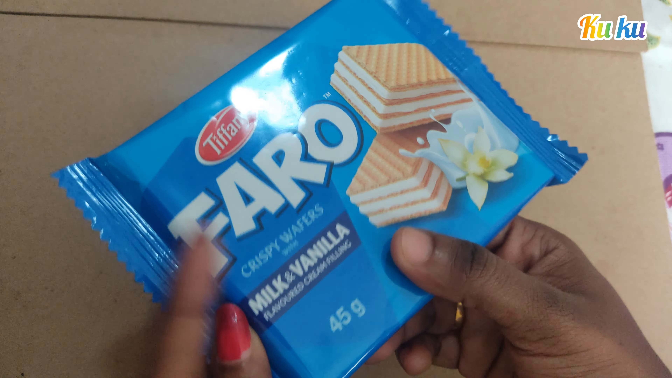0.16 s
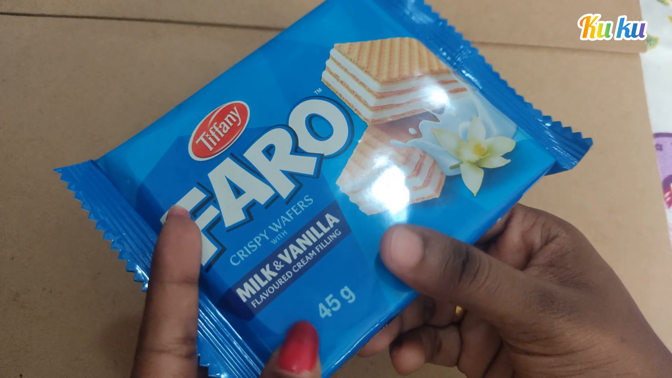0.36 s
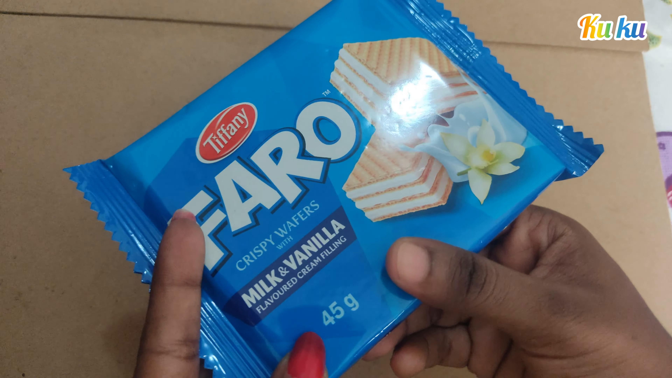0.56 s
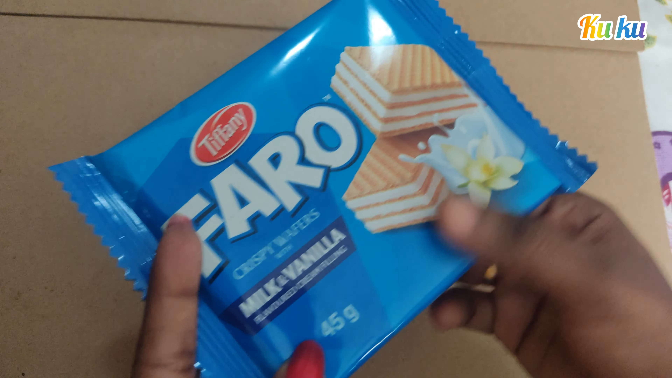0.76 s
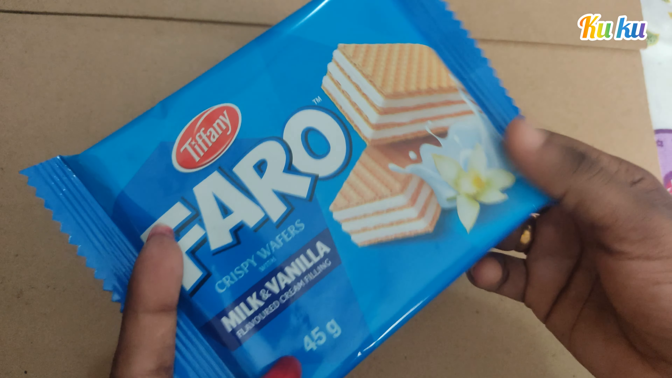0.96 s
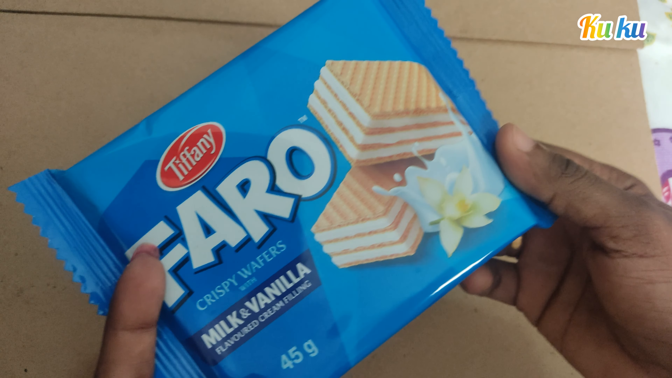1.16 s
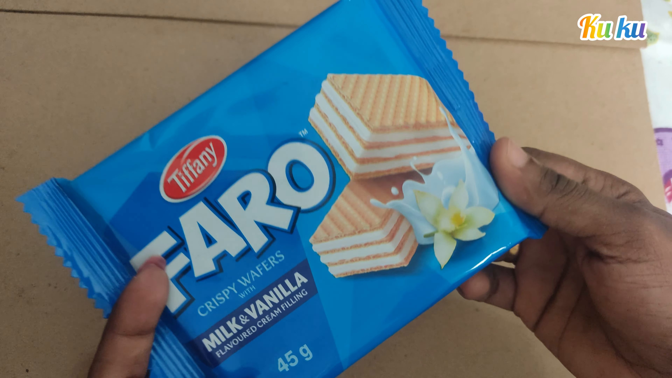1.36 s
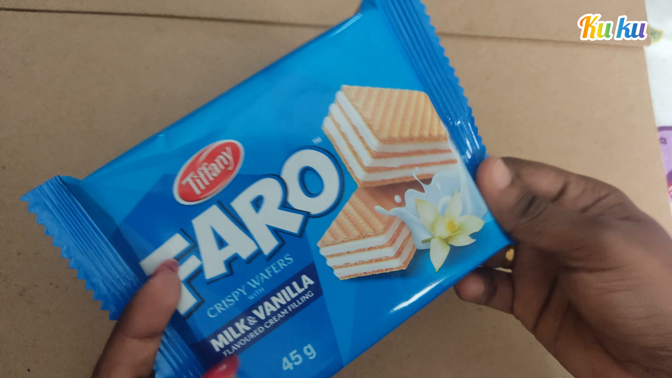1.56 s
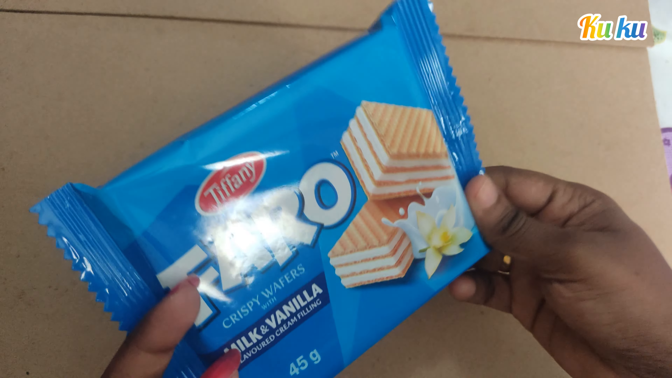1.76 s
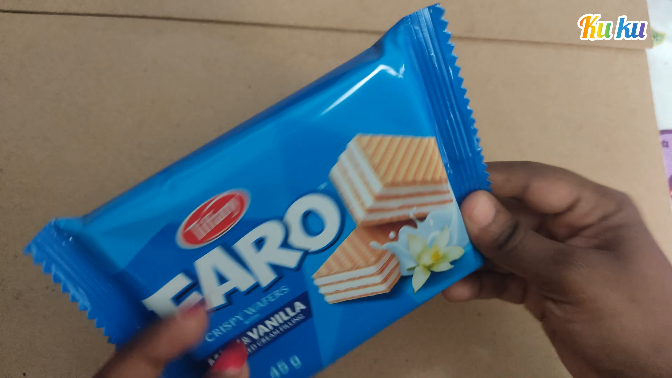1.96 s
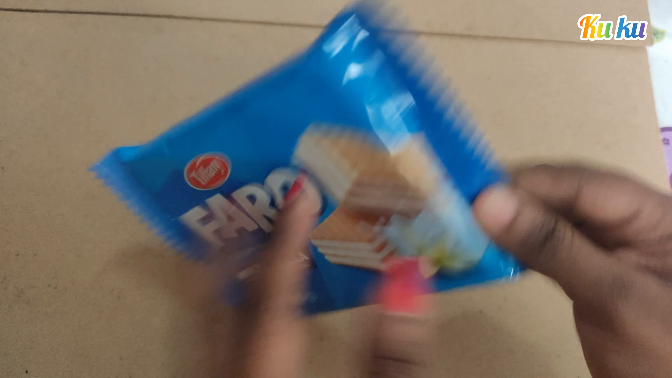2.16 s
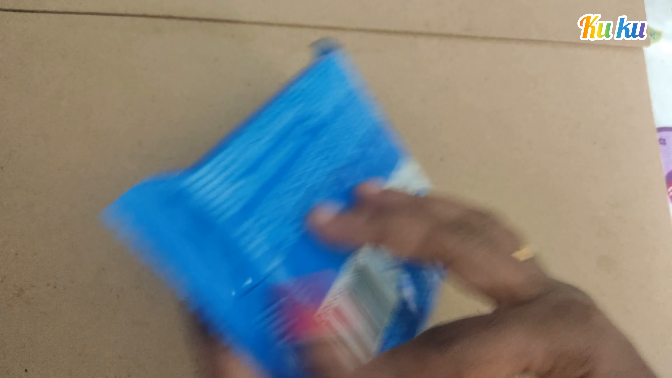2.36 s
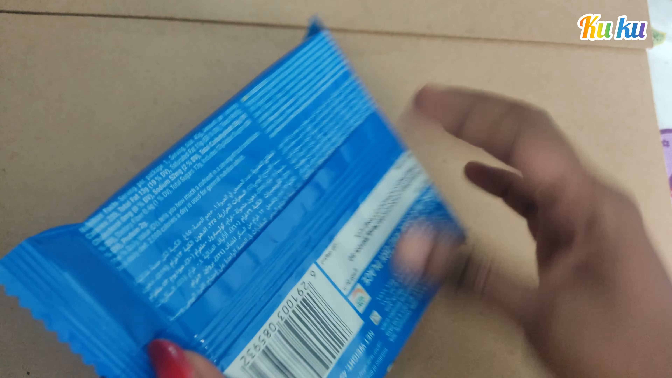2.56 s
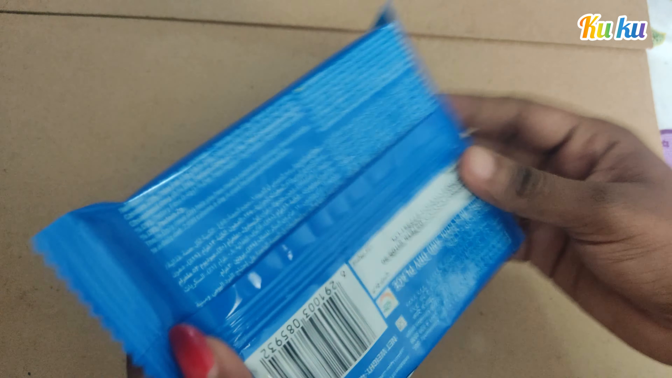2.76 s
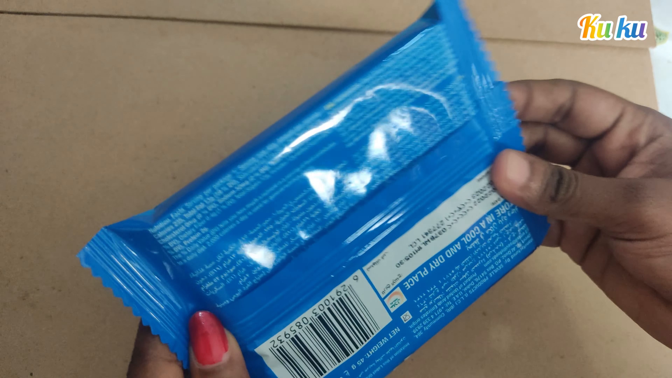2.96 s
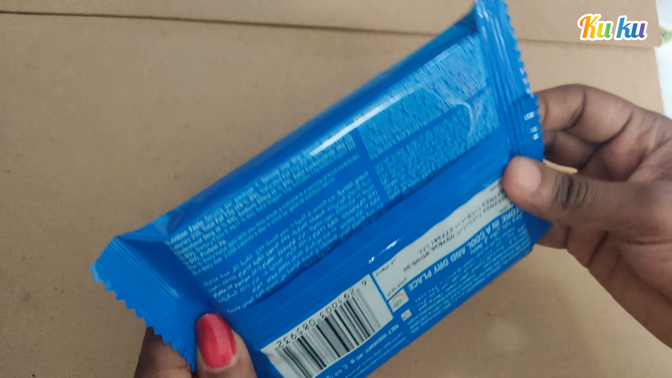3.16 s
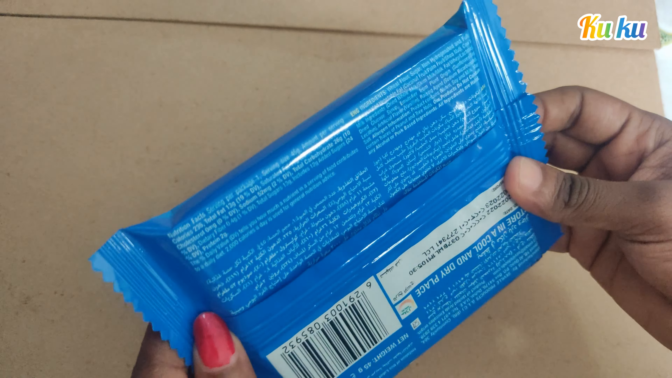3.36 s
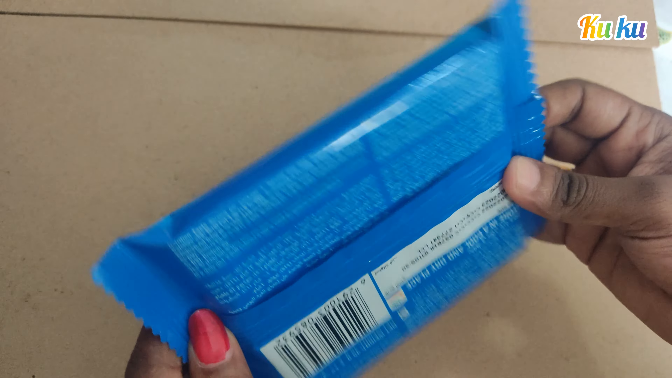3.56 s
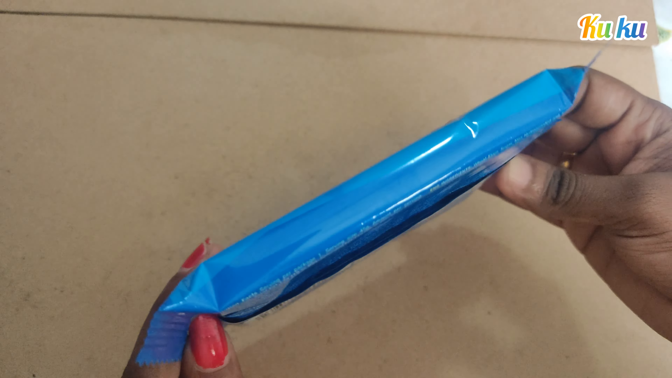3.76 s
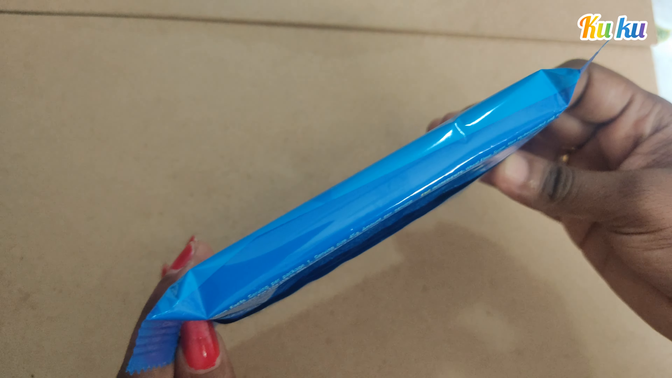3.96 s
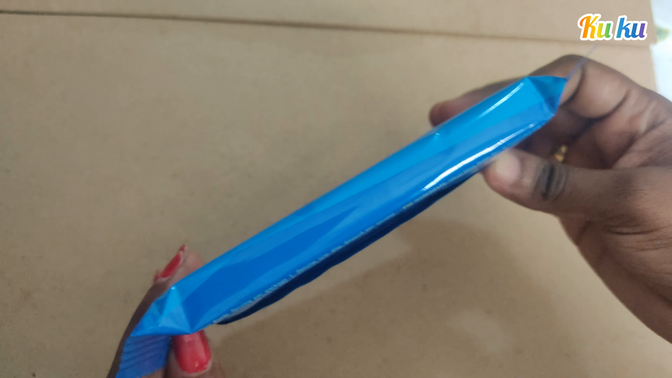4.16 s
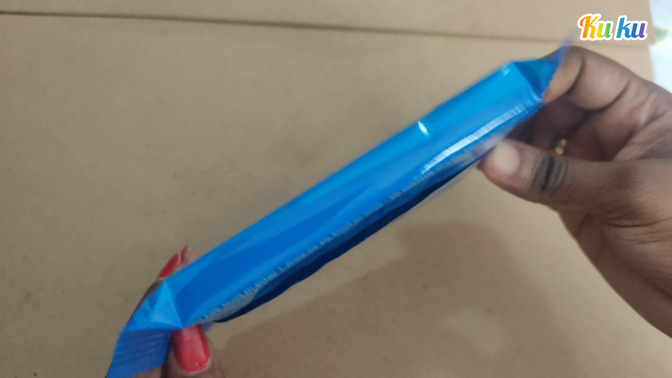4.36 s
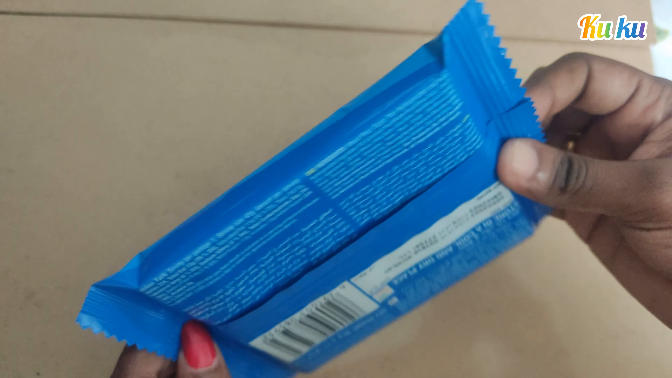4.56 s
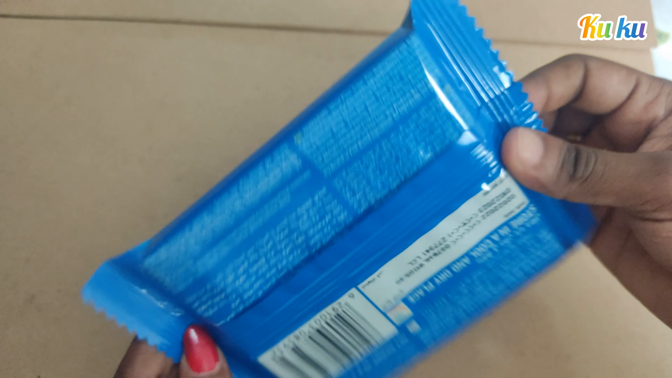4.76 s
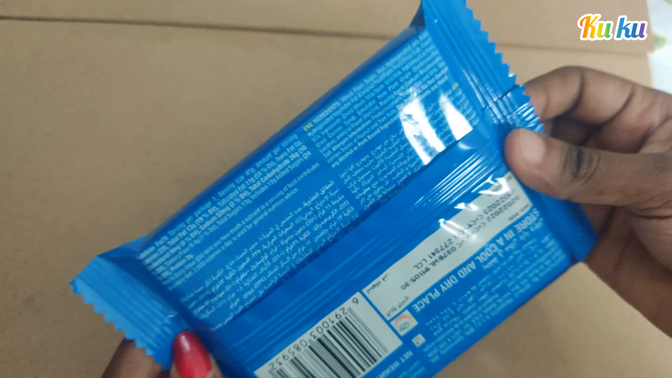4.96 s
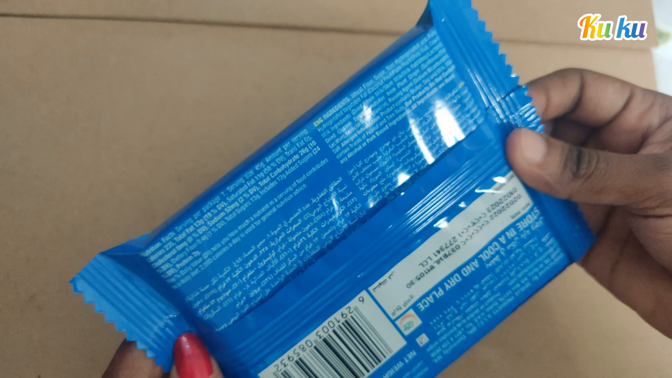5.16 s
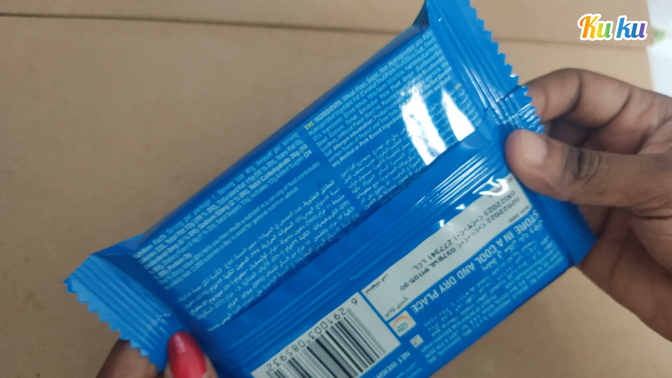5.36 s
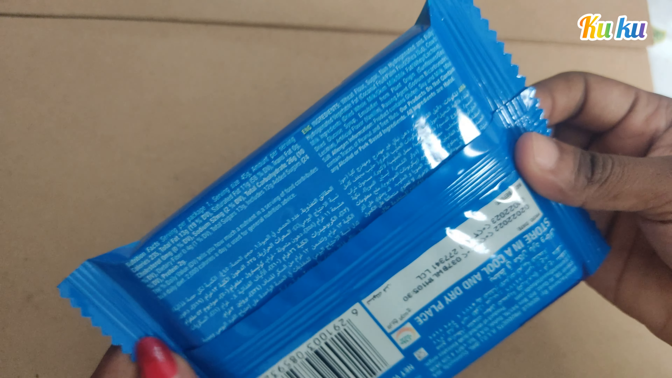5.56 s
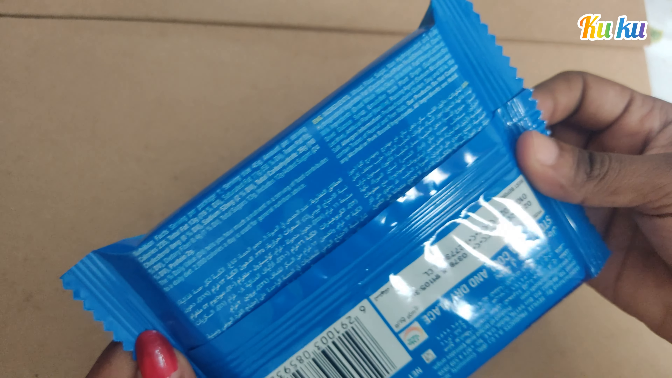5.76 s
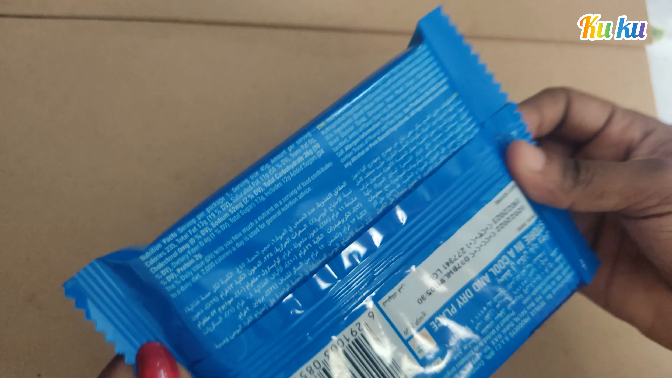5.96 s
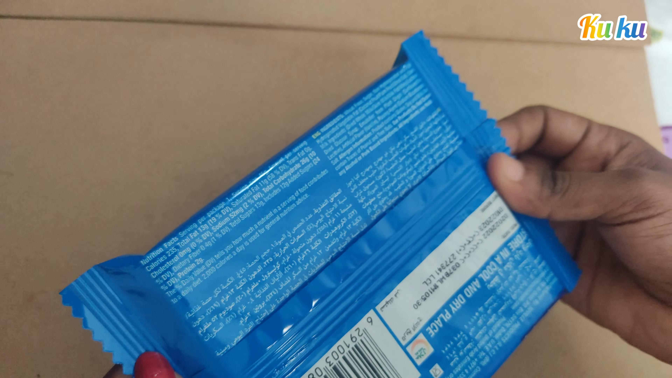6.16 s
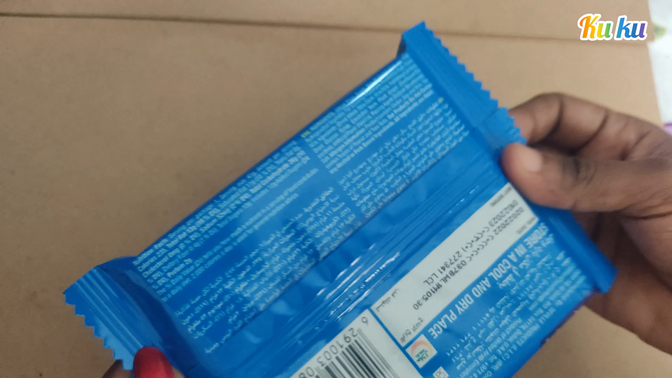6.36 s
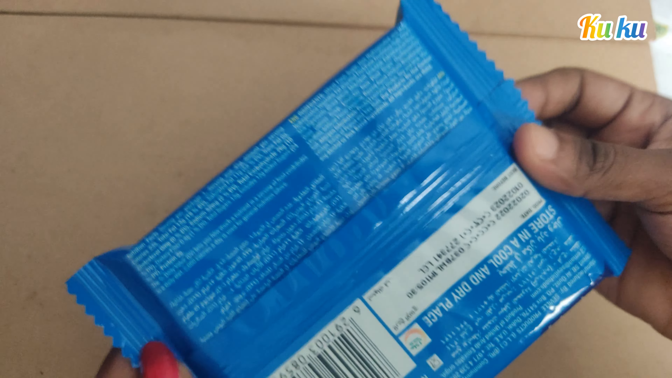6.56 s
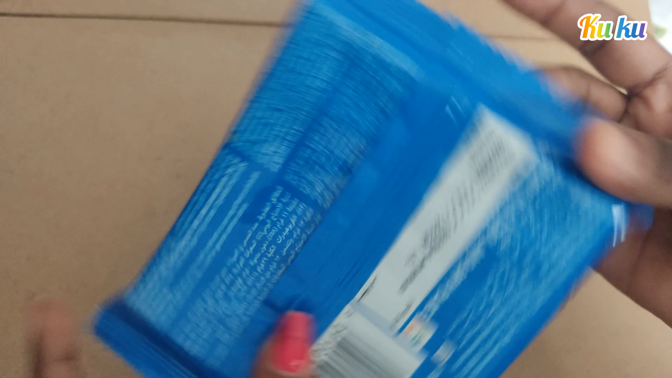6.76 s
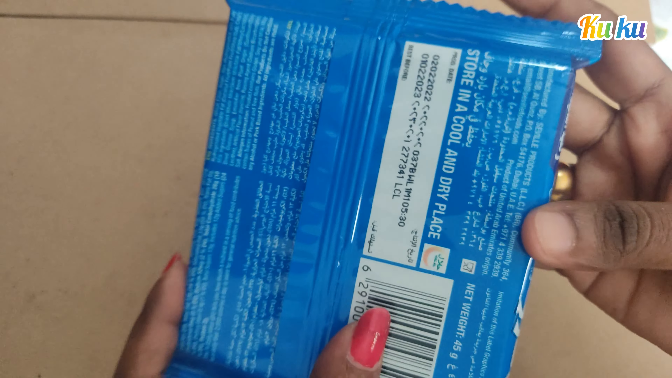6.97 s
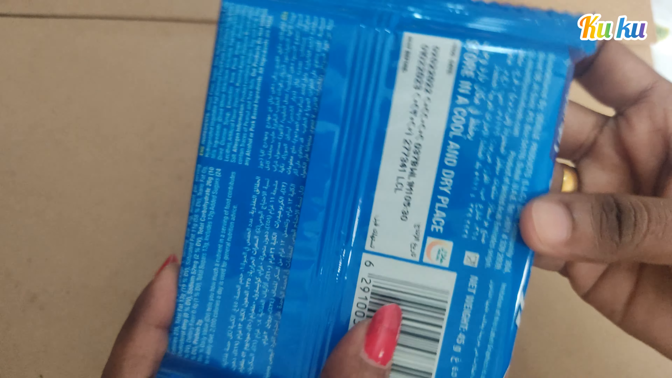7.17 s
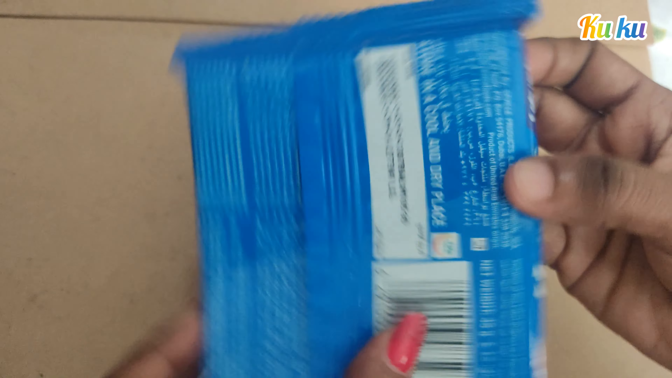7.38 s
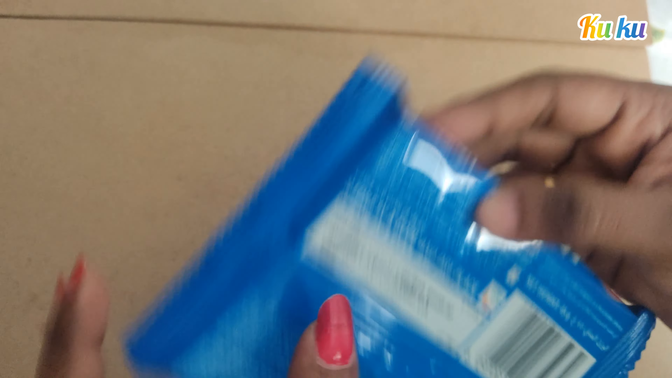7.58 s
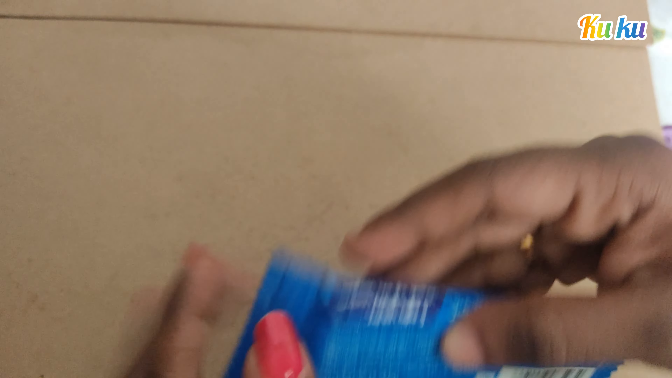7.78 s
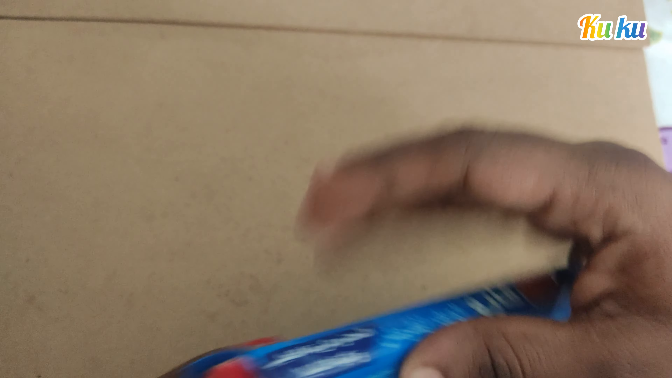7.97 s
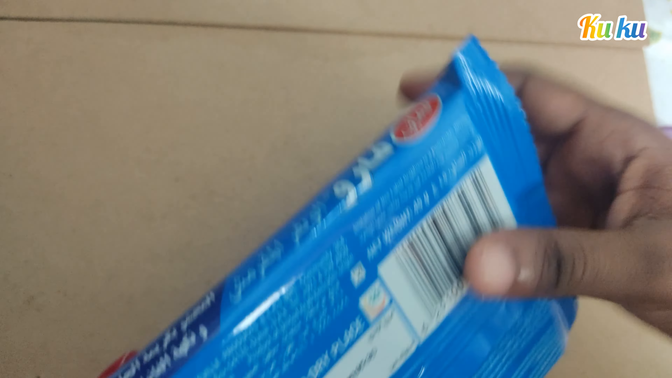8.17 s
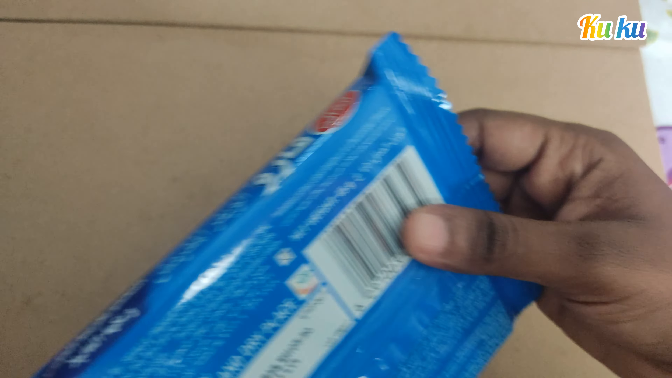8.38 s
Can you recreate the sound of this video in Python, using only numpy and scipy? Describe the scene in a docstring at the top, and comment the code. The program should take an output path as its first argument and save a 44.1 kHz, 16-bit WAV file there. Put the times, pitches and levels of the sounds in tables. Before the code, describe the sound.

Crisp film wrapper crinkles in bursts, busy then sparse, with soft knocks of the wafer inside, over quiet low fan hum and faint hiss.

```python
"""A fan hums under a faint hiss, and then a plastic snack packet turned in two hands snaps, crackles and rubs.
Snaps are short bursts of noise spikes, crackle is grainy noise, and rubbing is grainy noise in ringing folds.
A bare room answers the packet with dying noise; the wafer block inside knocks as damped swings.
Something wooden scrapes nearby: noise through resonances. The fan is noise in narrow low bands.
Both microphone ports ring near 8 kHz; the right one is nearer, so packet sounds reach the left one late."""
import sys
import numpy as np
from scipy import signal
from scipy.fft import rfft, irfft, next_fast_len
from scipy.io import wavfile
from scipy.ndimage import uniform_filter1d, map_coordinates

SR = 44100
rng = np.random.default_rng(int(sys.argv[2]) if len(sys.argv) > 2 else 0)


def materialize(psi):
    """Save the field psi as 16-bit PCM at rate SR to the path in sys.argv[1].

    A 1-D psi becomes a single channel; in a 2-D psi each row is a channel.
    """
    bounded = np.clip(np.atleast_2d(psi).T, -1, 1)
    quanta = np.round(bounded * 32767).astype(np.int16)
    wavfile.write(sys.argv[1], SR, quanta)


N = 371322  # length in samples

# Colour of ticks and crackle, peaking near 8 kHz, with a thin line near 16.5 kHz.
# Each row: frequency in Hz, relative level in dB per Hz.
CRACKLE_COLOUR = [(1760, -58), (3000, -24), (4940, -11), (5780, -5.5), (6720, -2), (7530, 7), (7970, 5),
                  (9000, 2), (9800, -10.5), (10300, -14), (15300, -23.5), (16200, -68), (16500, -41)]


def amp(db):
    """Turn dB into a plain factor."""
    return 10 ** (np.asarray(db) / 20)


def unit(x):
    """Scale a sound to an rms of 1."""
    return x / np.sqrt(np.mean(x ** 2) + 1e-20)


def along(points, hz):
    """Read a curve of (Hz, value) points, joined by straight lines on a log frequency axis."""
    f, v = np.transpose(points)
    return np.interp(np.log(hz + 1), np.log(f + 1), v)


def curves(rows):
    """One value per sample for each column after the time."""
    s, *cols = np.transpose(rows)
    return [np.interp(np.arange(N) / SR, s, c) for c in cols]


def wobble(rate):
    """A smooth random curve with rate knots a second."""
    knots = rng.standard_normal(int(N * rate / SR) + 4)
    return map_coordinates(knots, [np.arange(N) * rate / SR])


def filtered(x, response):
    """Colour x by a complex response of frequency."""
    n = x.shape[-1]
    m = next_fast_len(n + 4096)  # spare room for the ringing
    return irfft(rfft(x, m) * response(np.fft.rfftfreq(m, 1 / SR)), m)[..., :n]


def impulse(spectrum, size=512):
    """A click with the given spectrum that starts at once (minimum phase) and has energy 1."""
    hz = np.fft.rfftfreq(8 * size, 1 / SR)
    level_db = np.maximum(along(spectrum, hz), -70)
    cepstrum = irfft(np.log(amp(level_db)))
    # fold the second half onto the first, so that nothing rings before the click
    cepstrum[1:4 * size] *= 2
    cepstrum[4 * size + 1:] = 0
    h = irfft(np.exp(rfft(cepstrum)))[:size]
    return h / np.linalg.norm(h)


def modes(table):
    """A sum of resonances from rows of (Hz, width in Hz, dB), with alternating signs."""
    def response(f):
        total = 0
        for k, (centre, width, db) in enumerate(table):
            resonance = 1j * f * width / (centre * centre - f * f + 1j * f * width)
            total = total + (-1) ** k * amp(db) * resonance
        return total
    return response


def pair(alike, lag_s=0):
    """Two partly alike noises; the left one lags."""
    a, b = rng.standard_normal((2, N))
    left = np.roll(a, round(lag_s * SR))
    right = alike * a + np.sqrt(1 - alike ** 2) * b
    return np.array([left, right])


def swells(rows, rise_db, fall_db):
    """One gain curve per dB column: every (start, hold, dB..) row rises, holds and falls, in dB a second."""
    s, hold, *cols = np.transpose(rows)[:, :, None]
    t = np.arange(0, N + 64, 64) / SR  # a coarse clock is enough
    shape_db = -rise_db * np.maximum(s - t, 0) - fall_db * np.maximum(t - s - hold, 0)
    gains = []
    for c in cols:
        total = np.sqrt(np.sum(amp(c + shape_db) ** 2, axis=0))
        gains.append(np.interp(np.arange(N) / SR, t, total))
    return gains


def background():
    """A fan as noise in narrow low bands, over the hiss of room and microphone."""
    # Bands of the fan. Each row: centre in Hz, width in Hz, relative level in dB.
    fan_bands = [(25, 11, -20), (45.6, 11.3, -0.5), (68, 16, -6), (96.7, 7.4, -6.5), (150.3, 21, -5),
                 (200.1, 9.4, 1.5), (259.7, 29.5, -11.5), (339, 52, -16)]
    # Level of the hum over time. Each row: time in seconds, level in dB before the 1 dB added below.
    hum_levels = [(0.0, -58), (2.16, -59), (2.41, -53), (2.58, -59), (3.87, -55), (3.91, -58.5),
                  (8.42, -57.5)]
    # Colour of the hiss. Each row: frequency in Hz, relative level in dB per Hz.
    hiss_colour = [(150, -24), (260, 4.5), (492, -1), (980, -8), (2900, -32), (4030, -53), (4470, -57),
                   (7760, -19), (9220, -32), (10400, -60), (11500, -45), (13500, -54), (16000, -48)]
    fan = unit(filtered(pair(0.82), modes(fan_bands))) * amp(curves(hum_levels)[0] + 1.0)
    hiss = unit(filtered(pair(0.19), lambda f: amp(along(hiss_colour, f))))
    return fan + amp(-67) * hiss


def handling():
    """Gains of crackle and rub: fingers squeeze and slide on top of the mere holding."""
    # Each row: start in seconds, hold in seconds, crackle level in dB, finger rub level in dB.
    grips = [(.11, 0.16, -52.5, -60), (.545, 0.045, -58, -52.5), (.77, .12, -53.5, -63),
             (1.02, 0.022, -53, -64), (1.15, .07, -48, -60), (1.31, 0.058, -45, -50),
             (1.56, 0.036, -36, -46), (1.81, 0.024, -49, -56.5), (1.93, 0.091, -42.5, -53),
             (2.15, 0.033, -43.5, -66), (2.24, 0.15, -34.5, -43), (2.35, 0.14, -43.5, -47),
             (2.6, 0.037, -47, -52), (2.81, 0.081, -37, -45), (3.1, 0.16, -62.5, -61.5),
             (3.33, 0.015, -49.5, -52), (3.545, 0.13, -54.5, -54.5), (3.69, 0.062, -43.5, -60),
             (4.07, 0.033, -71, -63.5), (4.44, 0.12, -54, -68), (4.54, 0.083, -51.5, -54),
             (4.78, 0.038, -50, -59.5), (4.96, 0.06, -43, -69), (5.09, 0.045, -54.5, -71),
             (5.48, 0.12, -49, -54), (5.7, 0.079, -54.5, -61.5), (5.96, 0.054, -56.5, -64.5),
             (6.375, 0.052, -46.5, -72), (6.54, 0.07, -52.5, -55), (6.73, 0.12, -44.5, -53.5),
             (6.93, .04, -50, -58), (7.1, 0.051, -55, -60), (7.26, .1, -48, -56),
             (7.41, 0.047, -39.5, -49.5), (7.56, 0.021, -50, -54), (7.75, 0.025, -56.5, -62.5),
             (7.87, .03, -54, -53), (7.91, 0.023, -38.5, -41), (8.02, .07, -46.5, -56.5),
             (8.2, 0.051, -47, -57.5), (8.37, .05, -39, -51)]
    # Packet merely held. Each row: time in seconds, crackle level in dB, rub level in dB.
    held = [(0, -83, -67.5), (.09, -78, -78), (.12, -63.5, -71), (2, -55, -65), (2.72, -70, -80),
            (3.1, -65, -69), (4, -57.5, -70), (4.35, -67.5, -72), (5.3, -63.5, -73), (5.9, -60.5, -71),
            (7, -55, -66.5), (8.42, -75, -77)]
    return np.hypot(swells(grips, rise_db=896, fall_db=164), amp(curves(held)))


def grains(rate, spread_db, bed, count):
    """Envelope of clumped ticks, count samples long, on a smooth bed; it reaches the left port late."""
    sizes_db = spread_db * rng.exponential(size=N) + 4 * wobble(60)  # the slow curve makes clumps
    sizes = amp(np.minimum(sizes_db, 13))
    hits = rng.random(N) < rate / SR  # about rate ticks a second
    ticks = uniform_filter1d(hits * sizes, size=count) + bed
    return np.array([np.roll(ticks, 14), ticks])


def patchy(x, depth_db):
    """Random gain over time and frequency makes the crackle and rub patchy in colour."""
    z = signal.stft(x, nperseg=256)[2]
    field = rng.standard_normal(z.shape[1:])
    field = uniform_filter1d(field, size=7, axis=0)  # smooth over frequency
    field = uniform_filter1d(field, size=9, axis=1)  # smooth over time
    return signal.istft(z * amp(depth_db * unit(field)), nperseg=256)[1][:, :N]


def flex(hz, width, db):
    """A fold of the film flexes: grainy noise rings in one wide resonance."""
    grainy = grains(150, 1.7, 0.014, count=80) * pair(0.24, lag_s=14 / SR)
    return amp(db) * unit(filtered(grainy, modes([(hz, width, 0)])))


def hands():
    """Tiny creases tick under the fingers; folds of three sizes flex in their own colours as skin slides on film."""
    # Large, middle and small folds. Each row: centre in Hz, width in Hz, relative level in dB.
    folds = [(814, 396, 3), (1860, 1030, -2), (2850, 10600, -3)]
    # Colour of the rub: strongest near 4 kHz, weaker near 550 Hz.
    # Each row: frequency in Hz, relative level in dB.
    rub_colour = [(250, 2), (550, -6), (4000, 3.5), (8000, -3)]
    crackle_gain, rub_gain = handling()
    fine = grains(700, 4.5, 0.1, count=25) * pair(0.5)
    crackle = unit(signal.fftconvolve(fine, impulse(CRACKLE_COLOUR)[None], axes=1)[:, :N])
    flexing = sum(flex(*fold) for fold in folds)
    rub = unit(filtered(flexing, lambda f: amp(along(rub_colour, f))))
    both = patchy(crackle_gain * crackle + rub_gain * rub, depth_db=2.5)
    return both * amp([[-1.5], [1.5]])  # 3 dB toward the right


def small_snaps(count):
    """Small creases buckle by chance: rows like those of the loud snaps, as loud as the crackle around them."""
    spread_db = 3
    u, g = rng.random(count), rng.standard_normal((count, 5))
    at = ((np.arange(count) + u) * N / count).astype(int)  # one in each equal stretch of time
    tick_db = 20 * np.log10(handling()[0][at]) + 1.5 + spread_db * g[:, 0]
    thud_db = tick_db - 11 + 2 * spread_db * g[:, 1]
    thud_db = np.minimum(thud_db, tick_db)  # never louder than its tick
    thud_hz = 1260 * np.exp(0.22 * g[:, 2])
    ms = 1.8 * np.exp(0.21 * g[:, 3])
    pan_db = -7 + spread_db * g[:, 4]
    return np.transpose([at / SR, tick_db, thud_db, thud_hz, ms, pan_db])


def snaps(size=1024):
    """Each crease lets go in a few spikes; the film ticks and the air pocket under it thuds."""
    # The loudest creases that buckle. Each row: time in seconds, tick level in dB, thud level in dB (both rms
    # over 5 ms), thud pitch in Hz, length in ms (sets the fade), left-right difference in dB before the ports.
    loud_snaps = [(0.1057, -34.5, -47, 1280, 2.7, -10.5), (0.1293, -39.5, -65, 1660, 2.5, -11),
                  (0.1634, -47, -52, 1380, 3.5, -15), (0.2227, -40, -45, 1370, 3, -7),
                  (0.2398, -39, -45, 1300, 1.8, -5), (0.3131, -42.5, -49, 804, 3.5, -5),
                  (0.4084, -40, -53, 1360, 5.1, -4), (0.466, -34, -51.5, 786, 2.1, -4),
                  (0.7, -55, -58, 2500, 2, -11), (0.8644, -45.5, -53, 1700, 2.8, -11),
                  (0.9206, -39.5, -58, 940, 0.8, 1), (0.9786, -52, -54.5, 1070, 2.7, -9),
                  (1.146, -23.5, -36.5, 1840, 2.6, -8), (1.1735, -30, -39, 1030, 4, -3),
                  (1.215, -38.5, -39.5, 2870, 1.1, -6), (1.281, -32.5, -50, 1260, 1.1, -7),
                  (1.3051, -20, -34, 1700, 1.4, -8), (1.3192, -31, -42.5, 2300, 2.5, 7),
                  (1.5575, -19, -29, 1410, 1.7, -6.5), (1.5743, -22.5, -39, 1700, 2.8, -15),
                  (1.604, -38, -61, 2400, 1.4, -6), (1.7626, -31, -56, 2070, 1.4, -11),
                  (1.8042, -42, -64, 1700, 2.3, -9), (1.871, -38, -65, 1770, 3, -7),
                  (1.9202, -21, -29.5, 1090, 3, -9.5), (1.983, -35, -39, 1480, 7.5, -1),
                  (1.9947, -34.5, -52, 2220, 1, -12), (2.1554, -34.5, -40, 2800, 3.5, -10.5),
                  (2.249, -19, -37, 1980, 7.1, -4), (2.262, -20.5, -43, 2260, 1.1, -12),
                  (2.275, -20, -39, 2060, 1, -3), (2.313, -24.5, -32.5, 2160, 2.7, 10),
                  (2.3391, -14.5, -28, 1470, 6.6, -2), (2.3708, -22, -36, 1760, 3, 3),
                  (2.3878, -25.5, -52, 2300, 1.3, -2), (2.4495, -24.5, -56, 2070, 1.3, -10),
                  (2.5547, -28.5, -33, 805, 2.3, -10.5), (2.607, -30, -34, 2600, 0.83, -11),
                  (2.6388, -30.5, -66, 2870, 0.85, -7), (2.8066, -22, -33.5, 1790, 2.1, -6),
                  (2.8461, -25, -39.5, 1190, 4.2, -10.5), (2.8952, -36, -50, 2390, 1.5, -14),
                  (2.933, -33, -39.5, 2320, 1.1, -12), (2.9786, -33.5, -45.5, 1000, 8.7, -6),
                  (3.105, -52.5, -54, 1010, 2.2, 5), (3.268, -44, -49, 1060, 3.1, -7),
                  (3.3318, -32, -46, 1430, 1.5, -9.5), (3.3477, -40, -61, 2070, 3.9, -11),
                  (3.637, -44.5, -67, 1310, 0.72, -15), (3.6725, -34, -47.5, 1240, 0.5, -11),
                  (3.6968, -23, -32, 1200, 2.4, -8), (3.7121, -31.5, -64, 1330, 5.3, -1),
                  (3.747, -41, -45.5, 1130, 4.1, -1), (3.997, -43.5, -66, 990, 2, -4),
                  (4.4342, -47.5, -70, 795, 3.9, -5), (4.5321, -33.5, -49, 1680, 2.8, -5.5),
                  (4.5906, -36.5, -45, 2150, 2, -3), (4.737, -40, -52, 2080, 1.5, -7),
                  (4.7933, -37, -56, 2030, 3.6, -9), (4.8554, -44.5, -47.5, 1330, 1.5, -9),
                  (4.9354, -51, -43.5, 970, 3.7, -9), (4.9507, -15, -38, 2470, 1.5, -2),
                  (5.0892, -32.5, -46.5, 1660, 1, -5), (5.13, -57, -55, 960, 4.5, -7),
                  (5.2518, -40, -54.5, 2640, 1.5, -10), (5.443, -50, -54, 1470, 1.6, -8),
                  (5.4731, -36, -42, 960, 0.96, -4), (5.4863, -25, -40, 1090, 3.3, -10.5),
                  (5.492, -31.5, -52, 1830, 0.61, 5), (5.5271, -36, -47, 1610, 1.1, -12),
                  (5.6554, -42, -73, 1340, 2.3, -12), (5.67, -35.5, -60, 2720, 0.83, -14),
                  (5.7059, -46, -46.5, 1590, 1.7, -9), (5.7263, -43.5, -62, 1260, 0.6, -18),
                  (5.776, -37, -77, 1720, 2, -7), (6.0025, -38.5, -59, 1060, 2, -11),
                  (6.0187, -41.5, -54, 950, 2.1, -7), (6.1056, -45.5, -61, 1110, 4, -1),
                  (6.1442, -67, -50.5, 750, 3.4, -2), (6.1722, -46, -79, 990, 2.2, -8),
                  (6.2407, -46, -50.5, 1000, 4, -3), (6.295, -34, -43.5, 1000, 2.6, -3),
                  (6.3632, -34.5, -61, 1760, 1.5, -2), (6.3702, -29.5, -38.5, 1270, 2.4, -5),
                  (6.394, -38, -67, 2050, 3.3, -6), (6.4972, -29.5, -43.5, 1020, 2.1, 1.5),
                  (6.547, -37, -51, 2250, 1.8, -7), (6.6817, -36.5, -43, 890, 8.8, -9),
                  (6.7263, -32, -40.5, 2780, 0.64, -10.5), (6.7741, -31.5, -35, 1900, 3.4, -6.5),
                  (6.8127, -28.5, -32, 3130, 0.86, -10), (6.8258, -27.5, -60, 1690, 2.4, -9),
                  (6.9626, -45, -48, 1330, 8.1, -12.5), (7.035, -42, -50, 950, 1.2, -5),
                  (7.0478, -31.5, -57, 2450, 2, -13), (7.0615, -35.5, -50, 1190, 2.5, -6),
                  (7.2758, -37, -43, 1080, 2.1, -4.5), (7.334, -33.5, -40.5, 880, 8, -8),
                  (7.4074, -40.5, -54, 1630, 0.74, -19), (7.4194, -36.5, -40.5, 2300, 5.3, -13),
                  (7.4404, -28.5, -42, 2500, 4.7, -7), (7.45, -33, -34.5, 2100, 5.3, 0),
                  (7.607, -44, -38, 1010, 8.2, -8), (7.8786, -40, -64, 1230, 4.7, -8),
                  (7.9033, -42, -48, 940, 3.7, -15), (7.9362, -20.5, -40, 1470, 1.9, -12.5),
                  (7.961, -27, -48, 1830, 2.3, -10), (7.9709, -34, -60, 2100, 2.7, -17),
                  (7.9842, -31.5, -63, 1960, 4.9, -12), (8.1615, -24.5, -36.5, 2380, 1.8, -5),
                  (8.2669, -49, -42, 1320, 2.7, -9), (8.2808, -33.5, -46, 880, 4.6, -7),
                  (8.3198, -41.5, -49, 825, 6.3, -11), (8.3686, -23, -48, 2620, 1, 1),
                  (8.3841, -19.5, -35, 2740, 2.4, -6.5)]
    rows = np.vstack([loud_snaps, small_snaps(count=150)])
    s, tick_db, thud_db, hz, ms, pan_db = rows.T[:, :, None]
    a, b, c = np.moveaxis(rng.standard_normal((len(s), 3, size)), 1, 0)
    lag = np.round(SR * rng.uniform(.0002, 0.00041, s.shape)).astype(int)  # extra path to the left port
    t, life = np.arange(size) / SR, .5 * np.maximum(ms, .3) / 1000

    def shape(t):
        """Quick rise, slower fade."""
        rise = 1 - np.exp(-np.maximum(t, 0) / (0.055 * life))
        return rise * np.exp(-t / (2.52 * life))

    def level(x, db):
        """Set the rms over 5 ms and share the left-right difference between the ports."""
        rms = np.sqrt(np.sum(x ** 2, axis=2, keepdims=True) * 200 / SR)
        return amp(db + np.array([pan_db, -pan_db]) / 2) * x / rms

    def place(i, x):
        """Add every snap into one long track at its sample numbers."""
        return np.bincount(i.ravel(), x.ravel(), N + 2 * size)[:N]

    noise = np.abs(c) ** 1.17 * np.array([a, 0.83 * a + 0.28 * b])  # a few spikes stand out
    spikes = rfft(noise * [shape(t - lag / SR), shape(t)])  # in the treble mostly the onset lags
    spikes /= uniform_filter1d(np.abs(spikes).mean(0), size=15) ** 0.3  # spikes are broadband
    tick = signal.fftconvolve(irfft(spikes), impulse(CRACKLE_COLOUR)[None, None], axes=2)[..., :size]
    pocket, body = modes([(hz, 0.72 * hz, 0)]), modes([(1300, 2600, 0)])
    thud = filtered(noise * shape(t), lambda f: pocket(f) * body(f))
    tick, thud = level(tick, tick_db), level(thud, thud_db)
    at = np.round(s * SR).astype(int) + np.arange(size) - 8  # begin 8 samples ahead
    left = place(at + lag % 3, tick[0]) + place(at + lag, thud[0])  # the tick's onset already lags
    right = place(at, tick[1] + thud[1])
    return np.array([left, right])


def room(x, count):
    """Silence until the first wall, then a noise tail that dies by frequency, drawn afresh for each stretch of time."""
    # How long the tail rings. Each row: frequency in Hz, time to fall by 60 dB in seconds.
    ring_times = [(500, 0.084), (1500, 0.16), (4000, 0.27), (9000, 0.18), (15000, 0.1)]
    out, step, mono = np.zeros((2, N + SR)), -(-N // count), x.mean(0)
    for i in range(0, N, step):
        hz, t, z = signal.stft(rng.standard_normal((2, SR * 3 // 5)), SR, nperseg=256)
        fade = amp(-60 * t / along(ring_times, hz)[:, None])
        tail = signal.istft(z * fade, SR, nperseg=256)[1]
        tail *= np.interp(np.arange(tail.shape[1]) / SR, [.003, .012, .015], [0, .35, 1])
        tail /= np.linalg.norm(tail[0])
        wet = signal.fftconvolve(mono[None, i:i + step], tail, axes=1)
        out[:, i:i + wet.shape[1]] += wet
    return out[:, :N]


def bumps():
    """The wafer block knocks softly against fingers and palm: one damped swing each."""
    # Each row: time in seconds, peak level in dB before panning, pitch in Hz, time to fall by 60 dB
    # in seconds, left-right difference in dB before the ports.
    knocks = [(1.654, -41, 970, 0.015, -10), (1.839, -43.5, 756, 0.014, -15), (2.247, -44.5, 198, 0.076, 4),
              (2.344, -35.5, 342, 0.031, 3.5), (2.353, -52, 129, 0.099, 17), (2.407, -39, 205, 0.2, 3),
              (2.556, -33.5, 750, 0.015, -15), (2.61, -38.5, 780, 0.013, -11),
              (2.803, -37.5, 1050, .03, -11), (2.809, -39, 550, 0.011, -6), (2.845, -47, 897, 0.048, -26),
              (2.856, -47, 706, 0.027, -9), (2.882, -47, 500, 0.022, -8), (8.394, -41, 714, 0.017, -8)]
    out, t = np.zeros((2, N + SR)), np.arange(SR // 5) / SR
    for s, db, hz, t60, pan_db in knocks:
        push = np.sin(2 * np.pi * hz * t) * amp(-60 * t / t60)
        push *= 1 - np.exp(-t / 0.0014)  # soft start
        push *= amp(db) / np.abs(push).max()
        out[:, round(s * SR):][:, :len(t)] += push * amp([[pan_db / 2], [-pan_db / 2]])
    return out[:, :N]


def scrape():
    """Rough sliding noise in the resonances of a wooden thing, off to the left."""
    # Each row: start in seconds, hold in seconds, level in dB.
    strokes = [(3.08, .12, -61.5), (7.19, .15, -47.5), (7.4, 0.088, -58), (8.15, 0.15, -61.5)]
    # Resonances of the wood. Each row: centre in Hz, width in Hz, relative level in dB.
    wood = [(371, 33, 3.5), (461, 24, 6), (634, 23, 2), (870, 49, -4), (1066, 12, 4), (1330, 210, -13)]
    gain = swells(strokes, rise_db=255, fall_db=220)[0]
    return gain * unit(filtered(pair(0.4), modes(wood))) * amp([[1.5], [-1.5]])


def scene():
    """The packet with its room answer, the scrape, the knocks and the background."""
    packet = snaps() + hands()
    answer = amp(-10.0) * room(packet, count=14)
    return packet + answer + scrape() + bumps() + background()


def record(dry):
    """The ports differ in colour; nothing is kept above the band limit."""
    # How the ports differ. Each row: frequency in Hz, left-right difference in dB.
    port_tilt = [(60, 5.5), (400, 5.5), (800, 3.5), (2400, 5), (4400, -1.5), (6500, -2.5), (9000, 5),
                 (15000, 3)]
    top_hz = 16600

    def ports(f):
        """Half the difference for each port, with its own sign."""
        return amp(along(port_tilt, f) * np.array([[.5], [-.5]])) * (f < top_hz)

    return filtered(dry, ports)


dry = scene()
out = record(dry)
materialize(out)
```